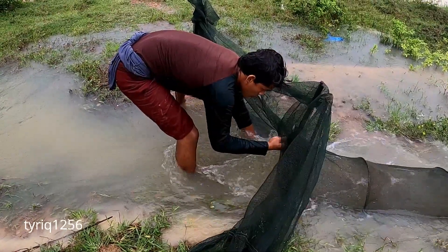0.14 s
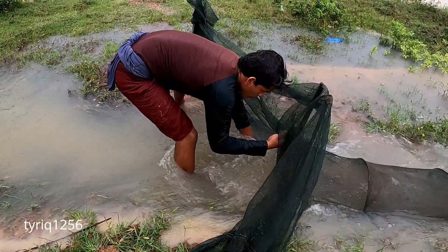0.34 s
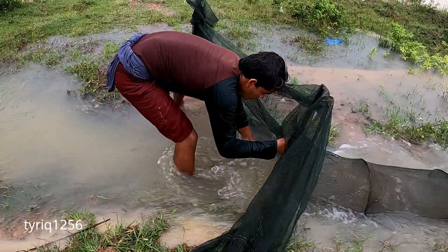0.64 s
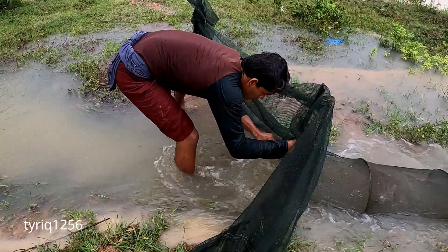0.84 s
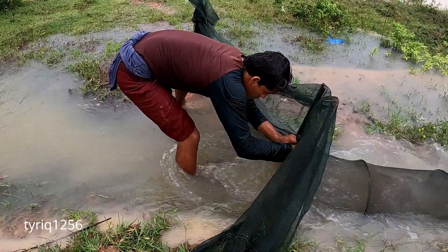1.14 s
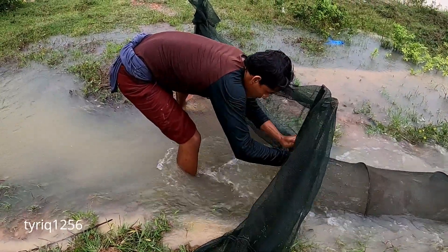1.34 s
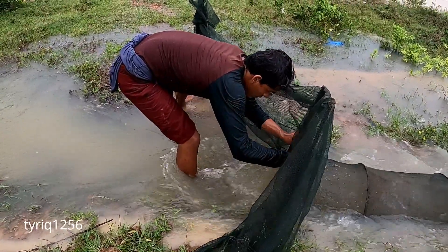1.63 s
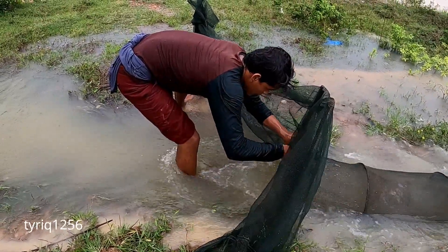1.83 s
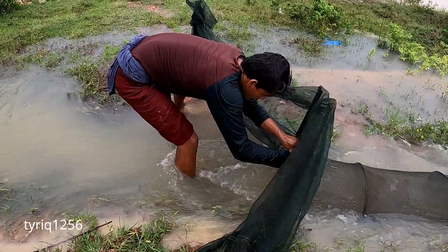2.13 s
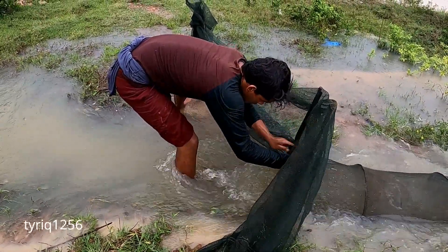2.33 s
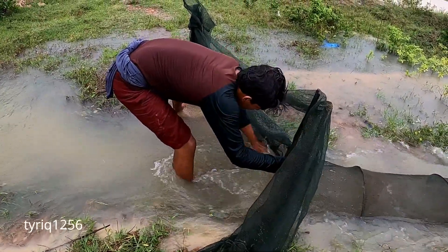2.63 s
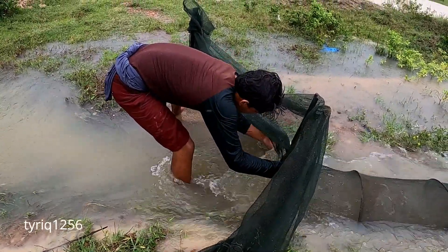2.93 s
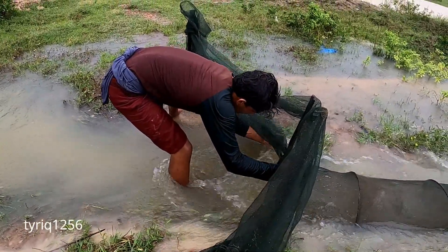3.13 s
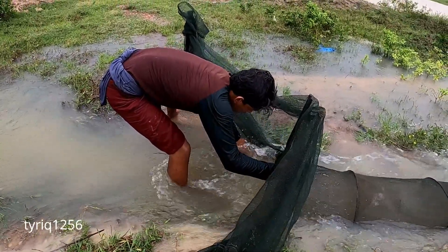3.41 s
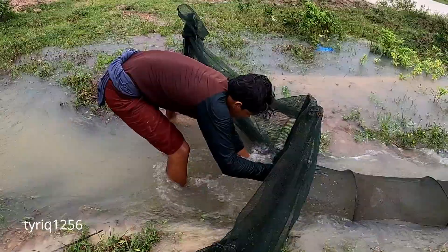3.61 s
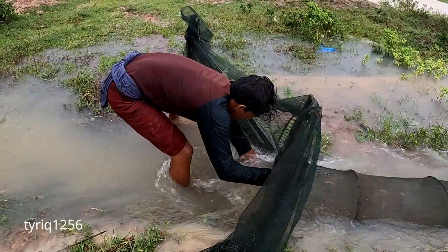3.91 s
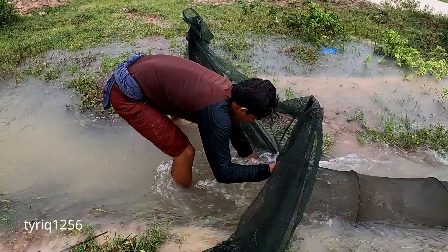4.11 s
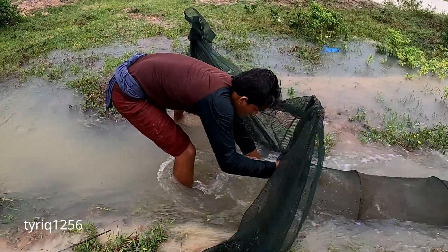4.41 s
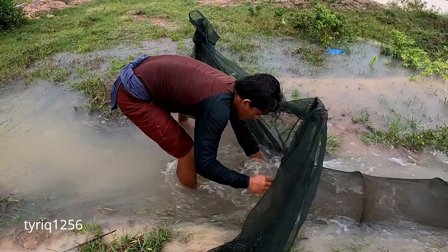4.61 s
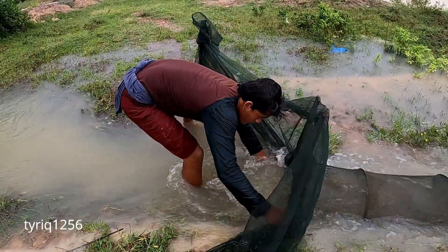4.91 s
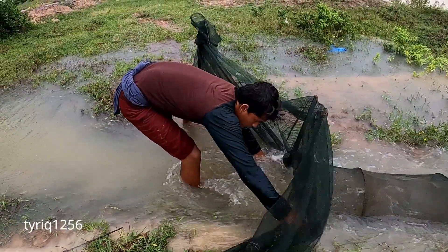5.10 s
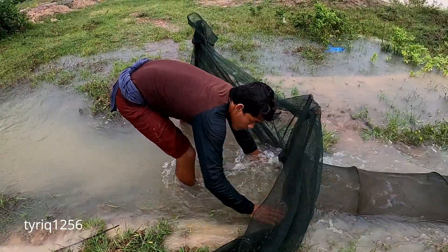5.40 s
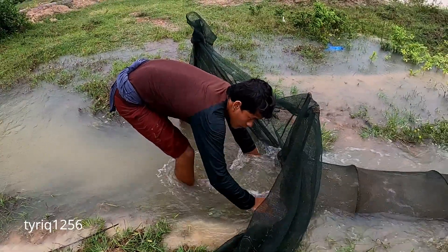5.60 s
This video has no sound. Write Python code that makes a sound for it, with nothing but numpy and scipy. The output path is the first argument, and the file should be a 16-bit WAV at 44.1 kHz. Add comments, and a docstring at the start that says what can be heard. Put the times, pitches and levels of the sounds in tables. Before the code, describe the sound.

Muddy water pours round a wader's legs and a net, bubbling steadily, while the hand-held recorder rumbles, clicks and becomes muffled halfway through.

```python
"""From the start, shallow floodwater rushes round a wader's legs and through a net trap in an open field:
big bubbles gulp near 600 Hz as decaying, gliding sines, under a fizz of spray made of narrow ringing bands.
Beneath it the hand-held recorder rumbles and bumps as filtered noise and low sines; from 0.7 s it also ticks.
The left microphone is muffled throughout; just before 3 s the right dulls too and the sound closes to the
middle, with a thin hiss left on the right. From about 5.3 s it begins to open again."""
import sys
import numpy as np
from scipy import signal
from scipy.fft import rfft, irfft
from scipy.io import wavfile

SR = 44100
rng = np.random.default_rng(int(sys.argv[2]) if len(sys.argv) > 2 else 0)


def unload_wav(signal):
    """Save mono or channel-first audio to the path in sys.argv[1] as 16-bit WAV at rate SR, clipped to [-1, 1]."""
    wavfile.write(
        sys.argv[1],
        SR,
        np.round(np.clip(np.atleast_2d(signal).T, -1, 1) * 32767).astype(np.int16),
    )


N = 253575
TIME = np.arange(N) / SR

# spectrum of rushing water at the open microphone: [f/Hz, level/dB]
RUSH_SPECTRUM = [(200, -99.5), (340, -75), (430, -62), (520, -57), (640, -49.5), (800, -58.5),
                 (1100, -68.5), (1900, -73.5), (3000, -78.5), (4500, -81), (7000, -90), (10500, -99.5),
                 (12300, -100.0), (15500, -114.0)]
# strength of the flow: [t/s, gurgle level/dB, spray level/dB]
FLOW_STRENGTH = [(0.0, 0.5, -0.5), (0.35, -2, -2), (0.68, 3.5, -1), (0.95, -1.5, 1), (1.17, -1.5, -2.5),
                 (1.52, 1, 0), (1.97, -4, -1.5), (2.25, 3, 0), (2.55, -1, -2), (2.72, 2, 0),
                 (2.86, 2.5, -4), (3.05, -3, -1.5), (3.38, -8.5, 1), (3.48, 1.5, 1.5), (3.66, -7, 2),
                 (4.0, -4.5, 1.5), (4.19, -2.5, 2), (4.35, -5.5, 2.5), (4.78, -3, 1), (5.14, -3, 2.4),
                 (5.3, -6, 0.5), (5.75, 3.5, 3.5)]
# loudest bubbles, deep gulps to small plips: [t/s, peak level/dB, f/Hz, t60/s, share by which f climbs over t60]
LOUD_BUBBLES = [(0.098, -23, 689, 0.1, -0.14), (0.114, -25.5, 1490, .025, -0.015),
                (0.222, -25, 662, 0.069, 0.069), (0.262, -27, 846, 0.11, -0.21),
                (0.3255, -24, 607, 0.082, -0.14), (0.421, -25.5, 1530, 0.028, 0.16),
                (0.4548, -18, 585, 0.047, 0.4), (0.477, -24, 2000, .018, 0.18),
                (0.5348, -27, 435, 0.16, 0.94), (0.552, -36, 1040, 0.045, .1), (0.58, -29, 4600, .012, .06),
                (0.616, -27.5, 3460, 0.02, .06), (0.639, -20.5, 492, 0.12, -0.16),
                (0.637, -20.5, 650, 0.075, 0.14), (0.701, -24.5, 3940, 0.014, 0.12),
                (0.708, -26, 980, .05, .15), (0.714, -24, 1670, .02, 0.3), (0.748, -19.5, 633, 0.047, 0.14),
                (0.766, -19, 590, 0.033, 0.062), (0.7897, -15, 590, 0.056, 0.28),
                (0.7995, -17.5, 643, 0.05, 0.077), (0.884, -19, 740, 0.024, .2),
                (0.901, -33, 4560, .016, 0.3), (0.9228, -23, 636, 0.033, .06),
                (0.942, -24.5, 896, 0.07, -0.17), (0.9472, -14.5, 633, 0.066, 0.066),
                (0.972, -33, 4420, .015, 0.13), (0.99, -21.5, 617, 0.13, -0.18),
                (1.0423, -24.5, 720, .03, 0.019), (1.04, -24, 958, 0.063, -0.18),
                (1.044, -33, 447, .16, .1), (1.070, -16, 722, 0.038, 0.75),
                (1.082, -18, 2920, 0.019, -0.098), (1.088, -27, 1090, .045, .2),
                (1.180, -20.5, 645, 0.058, -0.16), (1.238, -32, 429, 0.19, -0.17),
                (1.29, -32.5, 413, 0.2, 0.026), (1.341, -22, 582, 0.046, 0.08),
                (1.366, -28, 1780, .02, 0.017), (1.478, -28.5, 380, 0.11, 0.65),
                (1.59, -31.5, 492, 0.16, -0.35), (1.645, -25.5, 1270, 0.049, 0.22),
                (1.6613, -24, 620, 0.016, 0.37), (1.666, -22.5, 914, 0.052, 0.056),
                (1.668, -33, 414, 0.12, -0.46), (1.707, -31, 2470, .018, 0.0072),
                (1.716, -29, 3550, .015, 0.14), (1.776, -24, 545.4, 0.19, 0.44),
                (1.814, -21.5, 665, 0.15, 0.26), (1.948, -35, 427, 0.2, -0.035),
                (1.952, -29, 2550, 0.029, .08), (1.987, -23, 1890, .013, .08),
                (1.987, -24.5, 2760, 0.015, .08), (2.046, -21.5, 1730, 0.014, -0.29),
                (2.0605, -14.5, 673, 0.034, -0.15), (2.061, -29, 403, 0.14, 0.79),
                (2.127, -19.5, 3700, 0.013, -0.12), (2.105, -19.5, 616.5, 0.15, 0.43),
                (2.1395, -17, 640, 0.068, -0.067), (2.169, -37, 1790, .018, .1),
                (2.253, -18, 675, 0.1, -0.17), (2.3035, -19, 756, 0.048, 0.25),
                (2.374, -24.5, 719, 0.074, -0.0052), (2.422, -25.5, 533, 0.23, 0.48),
                (2.56, -31, 1730, 0.024, 0.22), (2.5805, -18, 760, 0.035, 0.47),
                (2.668, -12.5, 602, 0.13, -0.1), (2.718, -21, 688, 0.08, -0.16),
                (2.726, -27, 1490, 0.027, -0.14), (2.732, -20.5, 930, 0.038, 0.35),
                (2.790, -22.5, 644, 0.083, 0.14), (2.815, -25, 558, 0.2, 0.42),
                (2.876, -22, 647, 0.11, 0.36), (2.876, -30, 3220, 0.023, .06),
                (2.903, -23.5, 1020, 0.05, .05), (2.98, -32, 1100, 0.046, .15),
                (2.953, -27.5, 492, 0.061, -0.23), (3.07, -28, 1220, 0.044, -0.16),
                (3.111, -31, 437, 0.18, 0.21), (3.147, -21.5, 930, 0.036, -0.027),
                (3.148, -41, 375, 0.15, .05), (3.22, -26, 654, 0.18, 0.55), (3.462, -31, 582, 0.09, -0.22),
                (3.474, -36, 384, 0.078, -0.26), (3.581, -24, 1230, .03, .1),
                (3.745, -37, 348, 0.06, -0.16), (3.792, -28, 501, 0.14, -0.2),
                (3.935, -23, 765, 0.085, 0.15), (3.967, -21, 831, 0.06, 0.47),
                (3.985, -26, 965, 0.089, 0.14), (4.181, -25.5, 565, 0.21, 0.33),
                (4.207, -22, 654, 0.053, 0.18), (4.611, -29.5, 433, 0.21, 0.46),
                (4.618, -22, 1490, .025, .1), (4.667, -22.5, 460, 0.17, 0.84), (4.849, -28, 515, 0.2, 0.53),
                (5.0, -37, 392, 0.26, -0.059), (5.04, -34.5, 397, 0.21, 1), (5.132, -28, 429, 0.16, -0.16),
                (5.172, -30, 479.5, 0.24, 0.38), (5.199, -22, 685, 0.082, -0.14),
                (5.252, -22.5, 674, 0.056, .06), (5.251, -25, 2380, .035, .08),
                (5.488, -17, 2600, .04, 0.11), (5.581, -25, 562, 0.084, 0.083),
                (5.638, -33, 476, 0.069, -0.49), (5.675, -29, 533, 0.13, -0.16),
                (5.724, -28, 507, 0.15, 0.12)]
# small splashes, each a quick swell of spray: [t/s, swell level/dB, length/s]
SPLASH_SWELLS = [(0.46, 2.5, 0.018), (0.55, 3.5, 0.058), (0.693, 2, 0.054), (0.856, 0, 0.042),
                 (1.147, 3.5, 0.0098), (1.175, 0.5, .015), (1.365, -0.5, .025), (1.483, 2.5, 0.08),
                 (1.648, 4, 0.015), (1.705, 1.5, 0.048), (1.809, 4.5, 0.012), (1.879, 3.5, 0.019),
                 (2.163, 3.5, 0.013), (2.287, 4.5, 0.024), (2.566, 0.5, 0.047), (2.654, 0.5, 0.051),
                 (2.72, 2.5, 0.026), (2.806, -1, 0.023), (2.903, -0.5, .02), (3.01, 2, 0.034),
                 (3.147, 5, 0.018), (3.453, -0.5, .055), (3.928, 0.5, .06), (4.16, 1.5, .08),
                 (4.58, 3.5, 0.043), (5.114, 0, 0.1), (5.212, 2.5, 0.058), (5.548, 3.5, 0.016),
                 (5.64, -0.5, .03)]
BETWEEN_SPLASHES_DB = -0.61
SNAPS_PER_S, SNAP_SPREAD_DB = 110, 3.8
PLIPS_DB = -6
# sharpest snaps of landing drops, before a common gain: [t/s, level/dB]
LANDING_SNAPS = [(0.3114, -57), (1.4413, -51), (1.5186, -49), (1.6563, -44), (2.5443, -50), (2.9035, -44),
                 (3.1933, -54), (3.3784, -55), (3.746, -61), (4.5138, -52), (4.6635, -49), (4.857, -52),
                 (5.3988, -52), (5.5554, -54)]
DROP_SNAP_GAIN_DB, DROP_SNAP_LOW_HZ, DROP_SNAP_T60_S = 7, 8500, .004
PORT_LAG_S = .00008   # the water is nearer to the right microphone

# colour of the muffled sound: [f/Hz, muffled left level/dB, later dull level/dB]
MUFFLED_COLOUR = [(413, -2, 1), (602, -3.5, -7), (920, -4.5, -14.5), (1040, -8.5, -25.5), (1420, -9, -19),
                  (1574, -17, -20.5), (2230, -19.5, -26), (2700, -15, -23), (3230, -33, -24.5),
                  (3630, -17.5, -26.5), (4470, -23, -29), (8000, -30.5, -36.5), (12000, -42, -43.5)]
# colour of the right channel while half dulled, with a faint band near 2.5 kHz: [f/Hz, level/dB]
HALF_DULL_COLOUR = [(500, 4), (1100, 1), (1700, -1), (2200, -1), (2500, 5), (2850, -0.5), (3600, -2),
                    (5000, -0.5)]
# thin hiss heard on the right while the sound is dull: [f/Hz, level/dB]
HISS_COLOUR = [(7400, -33.5), (8400, -14.5), (10800, -19.5), (11900, 8)]
THIN_HISS_LOW_HZ = 11800
# the sound dulls at a steady rate, then begins to open again
DULLS_AT_S, DULLS_DB_PER_S = 2.797, 39
OPENS_AT_S, OPENS_SHARE_PER_S = 5.27, 0.33

# sharp ticks right at the recorder: [t/s, crack level/dB, lower edge f/Hz, upper edge f/Hz, grit t60/s,
# ping level/dB, ping f/Hz, ping t60/s, overtone level/dB, dull tail level/dB]
RECORDER_TICKS = [(0.71, -9, 300, 6000, .005, -56, 2550, .03, -55, -47),
                  (2.3, -10, 300, 5000, .01, -37, 2500, .03, -55, -38),
                  (2.67, -19, 300, 6000, .005, -51, 2550, .03, -53, -29),
                  (3.307, -22, 900, 4000, .018, -38, 2590, 0.02, -54, -33.5),
                  (3.6037, -13, 400, 7000, .006, -59, 2540, .02, -62, -33.5),
                  (3.8015, -6, 900, 5170, .004, -43.5, 2270, 0.063, -38, -33),
                  (3.964, -27, 1500, 5000, .01, -60, 2560, .03, -62, -45),
                  (4.508, -23, 1800, 3700, 0.022, -32.5, 2625, 0.019, -36, -29),
                  (5.108, -16.5, 400, 3050, .007, -60, 2550, .02, -59, -35.5),
                  (5.218, -23, 1500, 3900, 0.019, -46, 2620, 0.022, -57, -37.5),
                  (5.346, -32, 400, 2500, .01, -64, 2550, .02, -58, -38),
                  (5.476, -16, 1900, 3500, .014, -32, 2460, 0.018, -40, -36)]
# colour of the crack through the case: [f/Hz, level/dB]
CRACK_COLOUR = [(300, -32), (950, 3.5), (1200, -2), (1500, -7), (1900, -4), (2700, -7), (3250, -14),
                (3750, -13), (4150, -14), (4900, -18), (6200, -25), (9000, -27.5), (14000, -41)]
# colour of the dull tail of a tick: [f/Hz, level/dB]
TAIL_COLOUR = [(400, -41), (750, 9.5), (1200, 9), (1600, -16), (4000, -31.5), (10000, -64.5)]
PING_ROUGHNESS, PING_ROUGH_HZ = .45, 350
OVERTONE_HZ, OVERTONE_T60_S = 3600, 0.012
# dull bumps of the grip: [t/s, level/dB, f/Hz]
GRIP_BUMPS = [(2.307, -25.5, 258), (2.312, -26.5, 160), (2.631, -32, 147), (3.734, -32, 186),
              (4.227, -26.5, 160)]
BUMP_T60_S = 0.11
# spectrum of air and hand rumbling on the recorder: [f/Hz, level/dB]
RUMBLE_SPECTRUM = [(15, -74), (30, -65), (50, -59.5), (75, -61), (110, -63), (160, -65.5), (215, -70),
                   (260, -73.5), (330, -79), (500, -71.5), (1500, -135)]
# gain of the rumble: [t/s, level/dB]
RUMBLE_GAIN = [(0, -0.5), (0.2, -1), (0.72, -1.5), (0.92, -2.5), (1.5, -0.5), (1.7, -1), (2.15, -2.5),
               (2.46, 0), (2.72, -3), (2.95, -5.5), (3.25, -2.5), (3.52, -2.5), (3.72, 1), (3.9, -1),
               (4.25, 0), (4.97, -1.5), (5.56, 1.5), (5.75, -1.5)]
# spectrum of light air stirring each microphone on its own: [f/Hz, level/dB]
AIR_SPECTRUM = [(20, -73.5), (45, -71.5), (90, -82.5), (200, -83.5), (400, -83), (1000, -110), (3000, -140)]
CUTOFF_HZ = 15750


def from_db(db):
    """Logarithmic level: 20 dB is a factor of ten in amplitude."""
    return 10 ** (np.asarray(db) / 20)


def rms_one(x):
    """Normalisation to unit root-mean-square."""
    return x / np.sqrt(np.mean(x ** 2) + 1e-20)


def in_time(rows):
    """Linear interpolation: one curve over time for each column after t/s."""
    s, *columns = np.transpose(rows)
    return [np.interp(TIME, s, column) for column in columns]


def add(out, s, sound):
    """Superposition: mix a sound in at time s."""
    start = int(np.clip(s * SR, 0, N - 1))
    out[start:start + len(sound)] += sound[:N - start]


def drift(rate_hz):
    """Low-pass noise: a slow random curve of spread 1, computed at every 40th sample."""
    pole = np.exp(-80 * np.pi * rate_hz / SR)
    noise = rng.standard_normal(N // 40 + 2002)
    slow = signal.lfilter([1], [1, -2 * pole, pole * pole], noise)[2000:]    # settled part
    return np.interp(np.arange(N) / 40, np.arange(len(slow)), rms_one(slow))


def colour(x, points):
    """Minimum-phase filtering: folding the cepstrum gives a causal response through (f/Hz, level/dB) points."""
    size = 8192
    hz, db = np.transpose(points)
    grid = np.maximum(np.fft.rfftfreq(size, 1 / SR), 1)
    response_db = np.interp(np.log(grid), np.log(hz), db)
    cepstrum = irfft(np.log(from_db(response_db)))
    fold = np.r_[1, np.full(size // 2 - 1, 2), 1, np.zeros(size // 2 - 1)]
    impulse = irfft(np.exp(rfft(cepstrum * fold)))[:size // 2]
    return signal.fftconvolve(x, impulse)[:N]


def white():
    """White noise: equal power in every hertz, 0 dB per Hz."""
    return rng.standard_normal(N) * np.sqrt(SR / 2)


def pops(per_s, spread_db):
    """Poisson-like impulses: random clicks of either sign, many small and a few large."""
    sizes = from_db(spread_db * np.minimum(rng.exponential(1, N), 5))
    return (rng.random(N) < per_s / SR) * sizes * rng.choice([-1, 1], N)


def ring(hz, t60, rise=0, onset_cycles=0):
    """Damped oscillation: a sine swells over its first cycles and climbs by the share 'rise' over t60."""
    t = np.arange(int(max(t60, .002) * SR)) / SR
    swell = 1 - np.exp(-(t * hz / (onset_cycles + 1e-6)) ** 2)
    cycles = hz * t * (1 + rise * t / t60 / 2)
    return swell * from_db(-60 * t / t60) * np.sin(2 * np.pi * cycles)


def water():
    """Superposition at two points: the flow at left and right, with spray only partly shared between them."""
    gurgle_db, spray_db = in_time(FLOW_STRENGTH)
    burst = splashing() * from_db(1.1 * drift(26))    # wavelets break in quick spurts
    pockets = gurgle(count=1700, low_hz=364.8, high_hz=1414, cycles=46.0, spread_db=17.0, churn_db=-5)
    deep = 0.5 * from_db(gurgle_db) * pockets
    near, aside = [
        from_db(spray_db) * spray(burst, per_s=230, spread_db=3.5, cycles=31.0,
                                  patchy_db=2.0, wash_db=-7, snap_db=-3.0)
        for _ in range(2)]
    chirps = plips(count=1300, low_hz=720, high_hz=5000, cycles=64.0, spread_db=19.5)
    near = near + burst * from_db(spray_db + PLIPS_DB) * chirps
    # the higher the pitch, the less the two microphones hear alike
    shared = colour(near, [(1000, -5.0), (2000, 1.5), (4000, -15)])
    separate = colour(aside, [(700, -27.5), (2000, -4.0), (4000, -7.0)])
    bubbles = loud_bubbles()
    left, right = [colour(deep + fizz, RUSH_SPECTRUM) + bubbles for fizz in (shared + separate, near)]
    return np.interp(TIME - PORT_LAG_S, TIME, left), right


def loud_bubbles():
    """Bubble resonance: each gulp swells over about a cycle and glides as it dies, mostly upwards."""
    out = np.zeros(N)
    for s, db, hz, t60, climb in LOUD_BUBBLES:
        bubble = ring(hz, t60, rise=climb, onset_cycles=0.99)
        add(out, s, from_db(db) * bubble / np.abs(bubble).max())
    return out


def gurgle(count, low_hz, high_hz, cycles, spread_db, churn_db):
    """Air entrainment: pockets fold under behind legs and net; each climbs in pitch at its own rate."""
    out = np.zeros(N)
    for k, (when, pitch, size, damping, climb) in enumerate(rng.random((count, 5))):
        hz = low_hz * (high_hz / low_hz) ** pitch
        bubble = ring(hz, cycles * (.5 + damping) / hz, rise=0.5 * climb, onset_cycles=2.24)
        add(out, (k + when) / count * N / SR, from_db(spread_db * size) * hz * bubble)
    churn = colour(white(), [(200, -0.5), (1100, 1.0), (1700, -23.0), (3000, -60.5)])
    return rms_one(out) * np.sqrt(high_hz - low_hz) + from_db(churn_db) * churn


def spray(burst, per_s, spread_db, cycles, patchy_db, wash_db, snap_db):
    """Resonance under random impulses: tiny bubbles ring in narrow bands over soft wash; drops snap."""
    out, edges = np.zeros(N), np.geomspace(950, 18000, 27)
    for k, (low, high) in enumerate(zip(edges, edges[1:])):
        if k % 4 == 0:
            splash = drift(25)    # a small splash sheds bubbles of like size
        hz = np.sqrt(low * high)
        pole = from_db(-60 * hz / (cycles * SR))    # falls 60 dB in 'cycles' periods
        clicks = pops(per_s * np.sqrt(hz / 1000) * burst, spread_db) * from_db(patchy_db * splash)
        resonator = [1, -2 * pole * np.cos(2 * np.pi * hz / SR), pole * pole]
        band = signal.lfilter([1, 0, -1], resonator, clicks + 1e-18)
        out += rms_one(band) * np.sqrt(high - low)
    snaps = rms_one(pops(SNAPS_PER_S, SNAP_SPREAD_DB)) * np.sqrt(SR / 2)
    bright_snaps = colour(snaps, [(1000, -26.0), (4000, -19.5), (8000, -1.0), (12000, -13)])
    rest = from_db(wash_db) * white() + from_db(snap_db) * bright_snaps
    return burst * (out + colour(rest, [(400, -23.0), (1000, 6.0)]))


def plips(count, low_hz, high_hz, cycles, spread_db):
    """Bubble trapping: drops fall back and each encloses one small bubble, which chirps upwards."""
    out = np.zeros(N)
    for when, pitch, size, damping in rng.random((count, 4)):
        hz = low_hz * (high_hz / low_hz) ** pitch
        chirp = ring(hz, cycles * (.5 + damping) / hz, rise=0.25, onset_cycles=2.55)
        add(out, when * N / SR, from_db(spread_db * size) * hz * chirp)
    return rms_one(out) * np.sqrt(high_hz - low_hz)


def splashing():
    """Amplitude envelope of the spray: each splash swells, peaks halfway through its length and dies away."""
    db = np.full(N, BETWEEN_SPLASHES_DB)
    for s, swell_db, length in SPLASH_SWELLS:
        age = np.maximum(TIME - s, 0) / (length / 2)
        db = db + swell_db * age ** 2 * np.exp(1 - age ** 2)
    return from_db(db)


def drop_snaps():
    """Impact noise: single drops land with a thin, very short burst of high-pass noise."""
    out, t = np.zeros(N), np.arange(SR // 50) / SR
    thin = signal.butter(3, min(DROP_SNAP_LOW_HZ, SR / 3), "high", fs=SR, output="sos")
    for s, db in LANDING_SNAPS:
        snap = signal.sosfilt(thin, rng.standard_normal(len(t)) * from_db(-60 * t / DROP_SNAP_T60_S))
        add(out, s, from_db(db + DROP_SNAP_GAIN_DB) * snap / np.abs(snap).max())
    return out


def ticks():
    """Impact and ringing: a gritty crack, a short rough ping with an overtone, and a dull tail."""
    cracks, pings, tails = np.zeros((3, N))
    t = np.arange(SR // 4) / SR
    slow = signal.butter(2, PING_ROUGH_HZ, fs=SR, output="sos")
    for (s, crack_db, low_hz, high_hz, grit_t60, ping_db, ping_hz, ping_t60,
         overtone_db, tail_db) in RECORDER_TICKS:
        edges = [min(low_hz, high_hz / 2), min(high_hz, SR / 3)]    # at least an octave wide
        band = signal.butter(3, edges, "band", fs=SR, output="sos")
        grit, wash, flutter = rng.standard_normal((3, len(t)))
        crack = (t == 0) + 0.25 * grit * from_db(-60 * t / grit_t60)
        add(cracks, s, from_db(crack_db) * signal.sosfilt(band, crack))
        ping = ring(ping_hz, ping_t60, rise=0.078, onset_cycles=0.43)
        rough = 1 + PING_ROUGHNESS * rms_one(signal.sosfilt(slow, flutter))
        add(pings, s, from_db(ping_db) * ping * rough[-len(ping):])
        add(pings, s, from_db(overtone_db) * ring(OVERTONE_HZ, OVERTONE_T60_S, onset_cycles=3.3))
        add(tails, s, from_db(tail_db) * wash * from_db(-60 * t / 0.13))
    return colour(cracks, CRACK_COLOUR) + pings + colour(tails, TAIL_COLOUR)


def handling():
    """Structure-borne sound: rumble and bumps of the grip, the same at both microphones."""
    out = colour(white(), RUMBLE_SPECTRUM) * from_db(in_time(RUMBLE_GAIN)[0])
    for s, db, hz in GRIP_BUMPS:
        add(out, s, from_db(db) * ring(hz, BUMP_T60_S, onset_cycles=0.078))
    return out


def microphone_air():
    """Uncorrelated low-frequency noise: light air stirs each microphone on its own."""
    return np.array([colour(white(), AIR_SPECTRUM) for _ in range(2)])


def open_share():
    """Exponential closing, linear opening: the share (0-1) of bright, wide sound that comes through."""
    closing = from_db(-DULLS_DB_PER_S * np.maximum(TIME - DULLS_AT_S, 0))
    opening = OPENS_SHARE_PER_S * np.maximum(TIME - OPENS_AT_S, 0)
    return np.clip(closing + opening, 0, 1)


def scene():
    """Crossfade: two water signals fade into one dull sound and partly back, under rumble and ticks."""
    left, right = water()
    levels = np.array(MUFFLED_COLOUR)
    muffled, dulled = colour(left, levels[:, [0, 1]]), colour(left, levels[:, [0, 2]])
    openness = open_share()
    right = openness * right + (1 - openness) * colour(right, HALF_DULL_COLOUR)
    bright = np.array([muffled, right]) + microphone_air()
    high_pass = signal.butter(2, THIN_HISS_LOW_HZ, "high", fs=SR, output="sos")
    hiss = signal.sosfilt(high_pass, colour(left, HISS_COLOUR))
    dull = np.array([dulled, dulled + hiss])
    out = openness * bright + (1 - openness) * dull + handling() + ticks()
    out[1] += drop_snaps()    # too thin to reach the muffled left microphone
    return out


def record(dry):
    """Band limitation: a steep elliptic low-pass cuts the top."""
    return signal.sosfilt(signal.ellip(12, .1, 80, CUTOFF_HZ, fs=SR, output="sos"), dry)


dry = scene()
out = record(dry)
unload_wav(out)
```